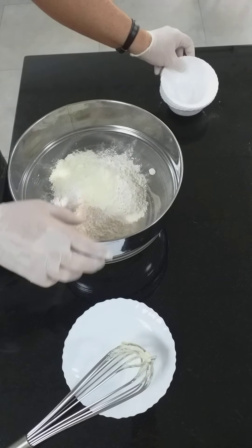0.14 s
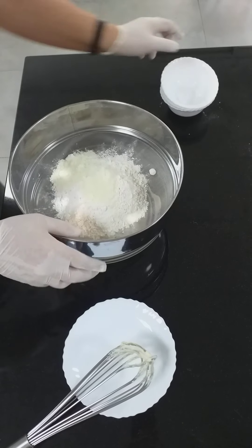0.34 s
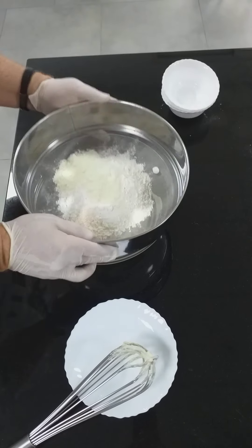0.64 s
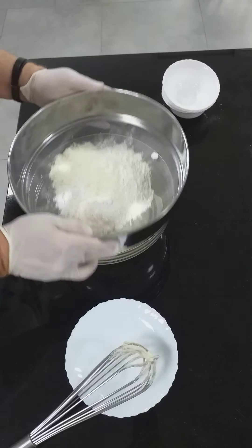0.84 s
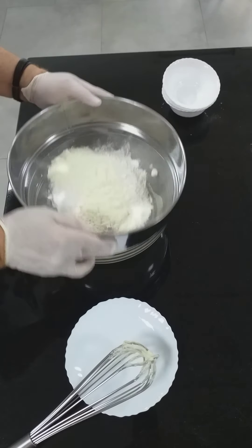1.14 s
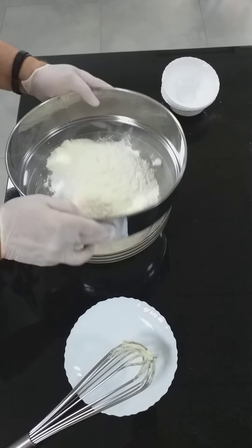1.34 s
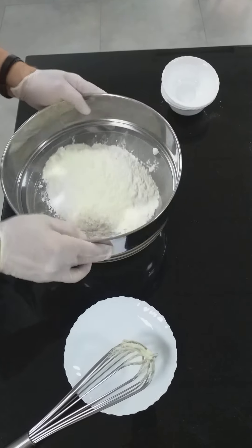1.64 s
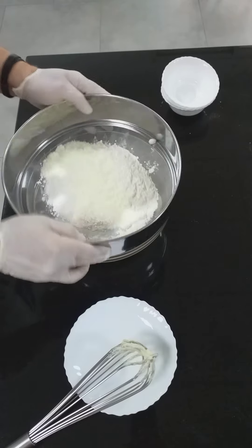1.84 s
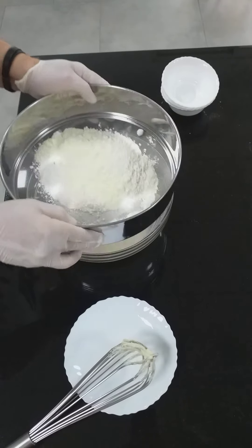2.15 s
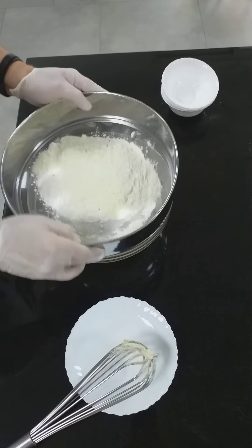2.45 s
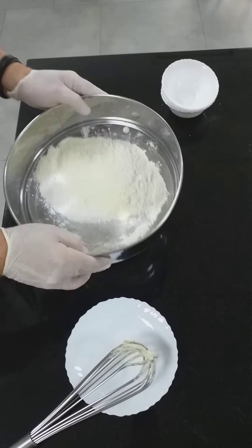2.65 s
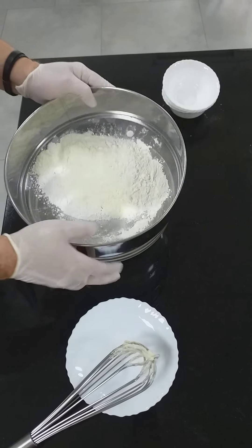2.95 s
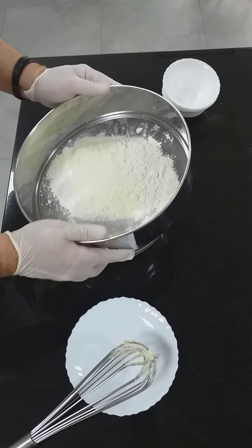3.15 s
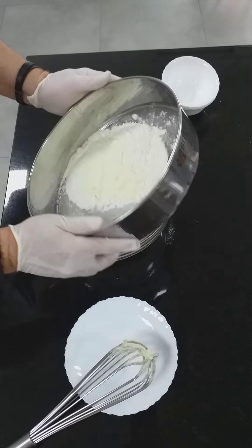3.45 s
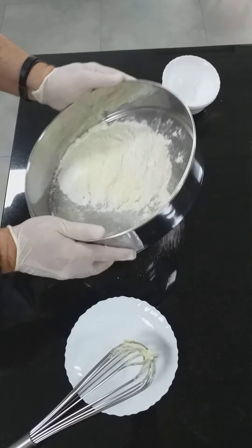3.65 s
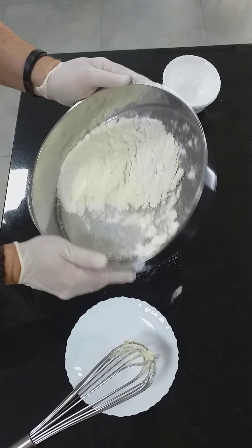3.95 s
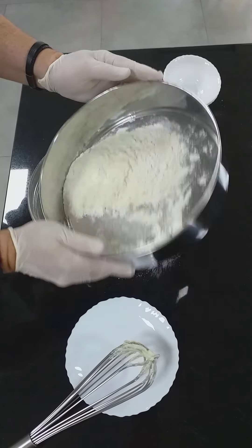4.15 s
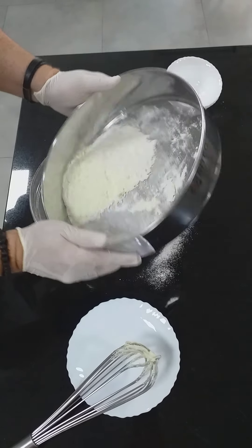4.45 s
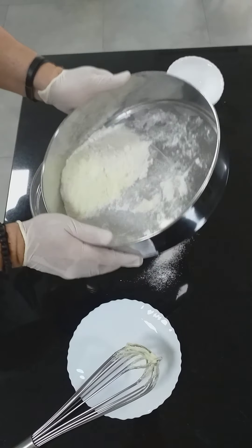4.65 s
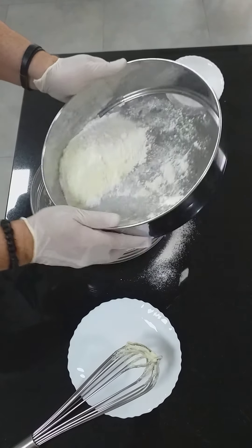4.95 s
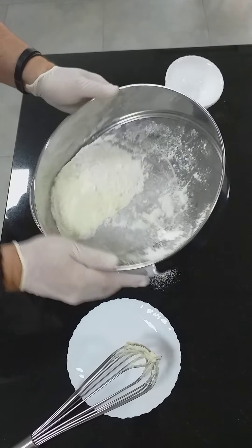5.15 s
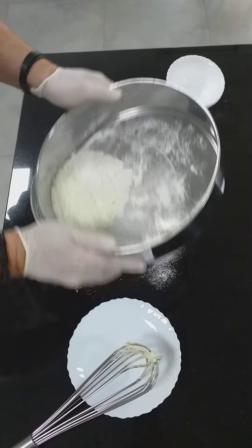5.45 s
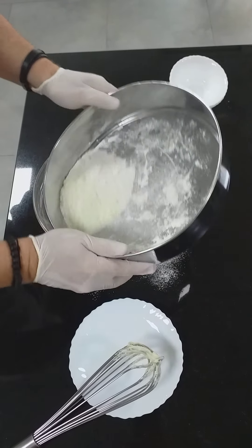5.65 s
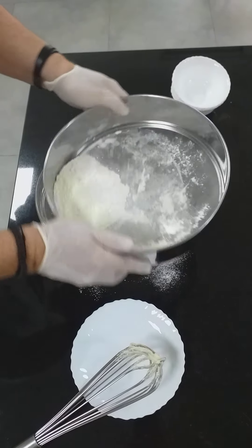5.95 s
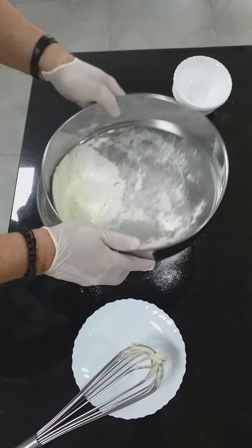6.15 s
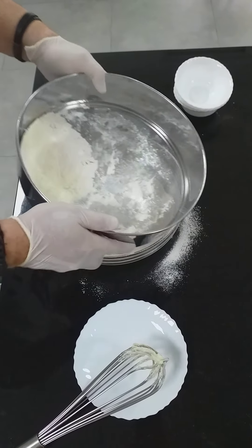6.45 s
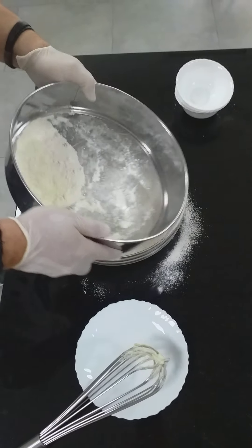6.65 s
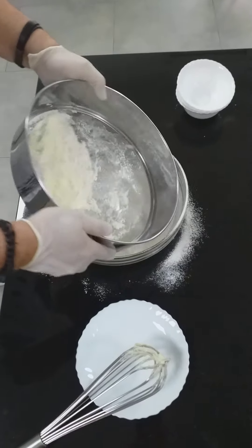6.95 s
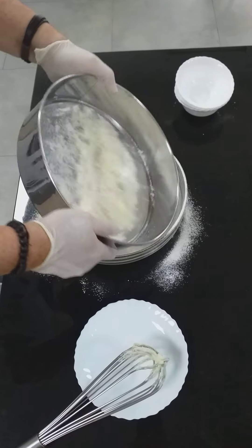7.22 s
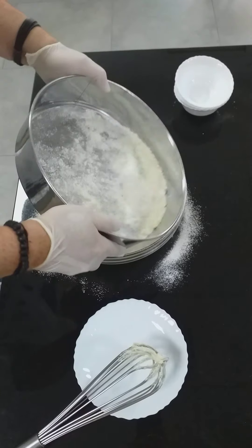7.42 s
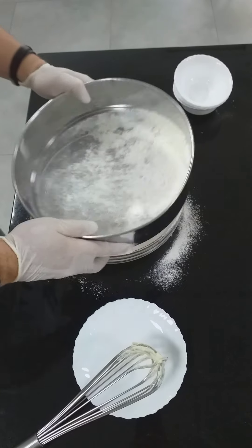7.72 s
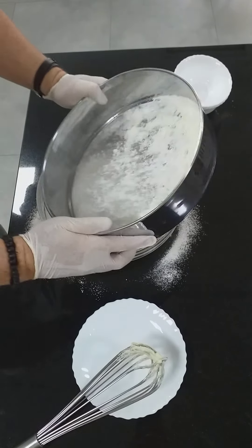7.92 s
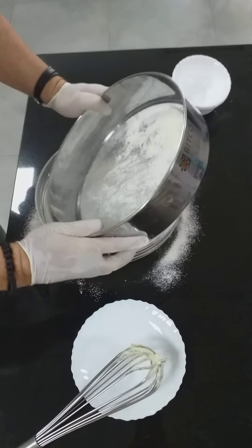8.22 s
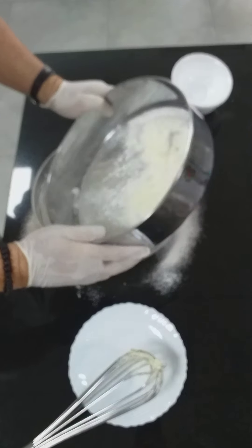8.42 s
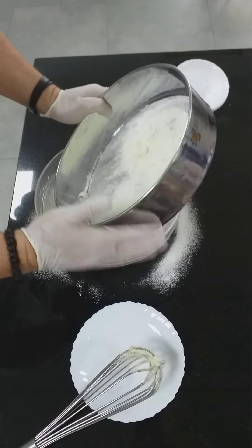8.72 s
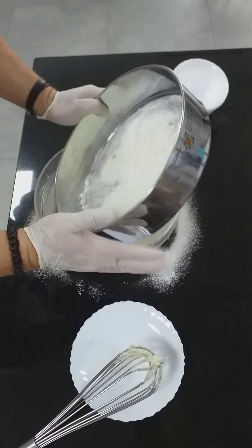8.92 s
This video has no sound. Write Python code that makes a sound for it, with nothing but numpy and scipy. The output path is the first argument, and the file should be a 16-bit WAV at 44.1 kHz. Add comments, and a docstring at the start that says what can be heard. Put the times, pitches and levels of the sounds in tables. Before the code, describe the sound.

In a small hard-walled kitchen with a faint wavering appliance hum, a cup bumps down and a sieve slides with a dry rub. Soft powder hisses in irregular shakes, then in quick even rocking. Light ticks lead to a loud, ringing double clang on the bowl, a few more knocks, and three palm slaps on the hoop. Close microphone, short bright reverberation.

```python
"""A small kitchen with a humming appliance: flour is sifted through a wide steel sieve over a metal bowl.
A cup is set down, the sieve slides off the bowl and is rocked so that powder hisses over its mesh.
It clangs twice on the bowl, and at the end a hand slaps the hoop to shake the rest through.
Hum and hiss are shaped sines and noise, contacts are short noise bursts, ringing metal is decaying sines.
Hard walls answer with tails of decaying noise."""
import sys
import numpy as np
from scipy import signal
from scipy.fft import rfft, irfft
from scipy.io import wavfile

SR = 44100
rng = np.random.default_rng(int(sys.argv[2]) if len(sys.argv) > 2 else 0)


def master(y):
    """Save y as 16-bit WAV."""
    cut = np.clip(np.atleast_2d(y).T, -1, 1)
    pcm = np.round(cut * 32767)  # scale
    wavfile.write(sys.argv[1], SR, pcm.astype(np.int16))


N = 400428
TIME = np.arange(N) / SR  # seconds

# The sieve knocks on the bowl: start_s, clatter_db, tilt_db_per_octave, hoop_ring_db, mesh_ring_db,
# clatter_decay_s
KNOCKS = [(1.170, -35, -11.5, -53, -43.5, 0.019), (7.0383, -14, -1.4, -25, -31, 0.022),
          (7.108, -14, -1.27, -31, -35, 0.0074)]
# The bowl's rim is grazed: start_s, ring_db, click_db
GRAZES = [(7.288, -32, -27.5)]
# The hoop's edge ticks on the bowl: start_s, level_db, body_db, contact_decay_s, edge_ring_db,
# pitch_factor (set by where it touches)
TAPS = [(1.163, -56, 9, 0.002, -74, 1), (1.204, -57, 13, 0.0034, -72, 1), (4.117, -48.5, 4, .005, -62, 1),
        (6.4543, -53, -6, 0.0033, -55, 0.97), (6.478, -52, -2, .004, -58, 1), (6.52, -57, -1, .004, -57, 1),
        (6.554, -42, 0, 0.0033, -44, 1), (6.639, -53, 2, 0.003, -53, 1), (6.7664, -55, 1, 0.0021, -54, 1),
        (7.825, -37.5, -7, 0.0055, -50, 1.29), (7.83, -36, -12, .014, -39, 1.29),
        (7.839, -32, -9, 0.005, -43, 1.29), (8.282, -43, 1.5, 0.01, -60, 1.06),
        (8.369, -29.5, 7, 0.017, -44, 0.53), (8.512, -46.5, 5, .007, -61, .7)]


def gain_of(db):
    """Decibels to amplitude."""
    return 10 ** (np.asarray(db) / 20)


def evened(x):
    """Scales to unit rms."""
    return x / np.sqrt(np.mean(x ** 2) + 1e-20)


def read(points, hz):
    """Reads a spectrum on a log-frequency axis."""
    f, value = np.transpose(points)
    return np.interp(np.log(hz + 1), np.log(f + 1), value)


def level(curve):
    """A level curve, straight in dB between its points, as amplitude."""
    s, db = np.transpose(curve)
    return gain_of(np.interp(TIME, s, db))


def add(mix, s, sound):
    """Mixes a sound in at time s."""
    part = mix[max(round(s * SR), 0):][:len(sound)]
    part += sound[:len(part)]


def colour(x, *spectra, size=4096):
    """Causal minimum-phase filter whose gain is the sum of some dB spectra."""
    hz = abs(np.fft.fftfreq(size, 1 / SR))
    total_db = sum(read(points, hz) for points in spectra)
    log_gain = np.log(gain_of(total_db))
    # the Hilbert transform of the log gain gives the phase
    taps = np.fft.ifft(np.exp(np.conj(signal.hilbert(log_gain)))).real
    return signal.oaconvolve(x, taps[:size // 2])[:len(x)]


def boost(x, peaks):
    """Lifts narrow resonances (pitch_hz, width_hz, level_db) out of a sound."""
    lifted = x
    for hz, width, db in peaks:
        b, a = signal.iirpeak(hz, hz / width, SR)
        lifted = lifted + (gain_of(db) - 1) * signal.lfilter(b, a, x)
    return lifted


def drift(rate_hz):
    """Slow chance of unit rms: noise kept mostly below the rate."""
    hz = np.fft.rfftfreq(N, 1 / SR)
    spectrum = rfft(rng.standard_normal(N)) * np.exp(-(hz / rate_hz) ** 2)
    return evened(irfft(spectrum, N))


def tilt(db_per_octave):
    """A straight slope above 500 Hz, level from 16 kHz: hard contacts are bright, soft ones dull."""
    return [(hz, db_per_octave * np.log2(hz / 500)) for hz in (500, 16000)]


def burst(db, decay, *spectra, treble_life=.4):
    """A crowd of modes struck at once and dying fast, the highest first; db is its energy spread over 10 ms."""
    t = TIME[:SR // 3]
    noise = rng.choice([-1., 1.], len(t))
    high_pass = signal.butter(2, 8500, "high", fs=SR, output="sos")
    top = signal.sosfiltfilt(high_pass, noise)
    body = (noise - top) * (1 - np.exp(-t / 0.0016)) * np.exp(-t / decay)
    # the shorter-lived treble is raised to keep its energy
    tick = top * np.exp(-t / (decay * treble_life)) / np.sqrt(treble_life)
    sound = colour(body + tick, *spectra)
    return gain_of(db) * sound / np.linalg.norm(sound) * np.sqrt(SR / 100)


def ring(modes, blows, rise):
    """Each blow (s, dB, tilt dB per octave) feeds the modes, which swell over the rise time and die away."""
    out, t = np.zeros(N), TIME[:2 * SR]
    for s, db, slope in blows:
        tones = np.zeros(len(t))
        for hz, mode_db, t60 in modes:
            strength = gain_of(mode_db + read(tilt(slope), hz))
            fading = np.exp(-np.log(1000) * t / t60)
            tones += strength * fading * np.sin(2 * np.pi * hz * (s + t))
        add(out, s, gain_of(db) * tones * (1 - np.exp(-t / rise)))
    return out


def swells(strokes, rise, fall):
    """Each stroke (s, dB, length factor) gathers speed and comes to rest in a bell curve; their powers add."""
    power = np.zeros(N)
    for s, db, length in strokes:
        width = length * np.where(TIME < s, rise, fall)
        bell = np.exp(-np.minimum(((TIME - s) / width) ** 2, 20))
        power += (gain_of(db) * bell) ** 2
    return np.sqrt(power)


def appliance(air_db=-54, hum_db=-51.0, waver_hz=2.8):
    """Hum lines whose strength and phase waver, over a soft rush of air with faint whistles."""
    # still air of the kitchen: pitch_hz, relative level_db per Hz
    air = [(30, -43), (70, -12.5), (124, -13), (220, -6.5), (380, -8.5), (560, -15.5), (990, -22.5),
           (1540, -34), (2300, -38.5), (2800, -34.5), (4300, -35.5), (6900, -32.5), (8740, -53),
           (16000, -33.5)]
    # faint whistles in the appliance's draught: pitch_hz, width_hz, boost_db
    draught = [(2765, 51, 14), (3480, 106, 11.5), (3820, 140, 6.5)]
    # steady lines of the appliance: pitch_hz, level_db relative to hum_db, waver_depth
    hum = [(87.8, -17, .6), (175.7, -1, .15), (276.4, -9, .8), (351.1, -5, .4), (447.9, -16, .6),
           (497.6, -17, .8), (526.9, -18, .7), (657, -20, .5)]
    rush = boost(colour(rng.standard_normal(N), air), draught)
    out = gain_of(air_db) * evened(rush)
    for hz, db, waver in hum:
        phasor = 1 + waver * (drift(waver_hz) + 1j * drift(waver_hz))
        phase = 2 * np.pi * hz * TIME + 1.59 * drift(0.88)  # radians
        line = (phasor * np.exp(1j * phase)).real
        out += gain_of(hum_db + db) * evened(line)
    return out


def kitchen(x, first_echo=0.0042):
    """Dense reflections from hard walls, each band with its own strength and decay."""
    # how strongly the walls answer: pitch_hz, relative level_db
    walls = [(400, -3.5), (950, 3), (1900, 0), (5000, -3.5), (12000, -5.5)]
    # reverberation time: pitch_hz, t60_s
    reverberation = [(150, 1), (500, 0.69), (1500, 0.58), (4000, 0.53), (7000, 0.54), (14000, 0.41)]
    noise = rng.standard_normal(SR) * (rng.random(SR) < 4000 / SR)  # about 4000 reflections per second
    hz, t, z = signal.stft(noise, SR, nperseg=256)
    strength = gain_of(read(walls, hz))[:, None]
    fading = np.exp(-np.log(1000) * t / read(reverberation, hz)[:, None])
    tail = signal.istft(z * strength * fading, SR, nperseg=256)[1][:SR]
    # silent until the first echo, in full after twice that time
    tail = tail * np.clip(TIME[:SR] / first_echo - 1, 0, 1)
    return signal.fftconvolve(x, tail / np.linalg.norm(tail))[:N]


def echoes(x, turn_s=0.16, count=3):
    """Several random tails of the same kitchen cross-fade in turn, so that like hits do not share one echo colour."""
    turn = TIME / turn_s
    out = np.zeros(N)
    for k in range(count):
        distance = abs((turn - k + count / 2) % count - count / 2)  # in turns, around the cycle
        share = np.cos(np.pi / 2 * np.minimum(distance, 1))
        out += kitchen(x * share)
    return out


def touch(db, decay, body_db, sparkle_db, thud_db):
    """A blow on the hand-damped sieve: body below 3.8 kHz, sparkle above 8 kHz, and a low thud."""
    # colour of a tap on the hoop damped by the hand: pitch_hz, relative level_db per Hz
    tap_colour = [(80, -23), (400, -20.5), (1000, -20), (1400, -10), (2400, -8), (3200, 2.5), (3900, -3.5),
                  (4600, 0), (5200, -4.5), (6200, 3.5), (7200, -3), (8400, -22), (9600, -24), (14000, -10)]
    # push of the palm: pitch_hz, relative level_db per Hz
    palm_colour = [(40, -26), (80, 0), (140, 3), (250, -3), (420, 0.5), (700, -10), (1500, -20.5)]
    shade = [(3800, body_db), (5800, 0), (8000, 0), (13000, sparkle_db)]
    contact = burst(db, decay, tap_colour, shade)
    return contact + burst(db + thud_db - 19.5, 0.0066, palm_colour)


def contacts(sparkle_per_body=-0.38):
    """The short clatter of every knock, graze, bump, tick, flick and slap, as noise bursts."""
    # crowd of short-lived steel modes in a knock: pitch_hz, relative level_db per Hz
    clang = [(60, -36), (150, -5), (290, -17.5), (480, 3.5), (720, -8.5), (1050, -5), (1500, -9),
             (1850, -6), (2300, -9.5), (3600, -10.5), (4200, -14.5), (7000, -12.5), (9300, -33),
             (14000, -22)]
    # groups of steel modes that stand out of the clatter: pitch_hz, width_hz, boost_db
    steel = [(1000, 90, 2), (1830, 60, 8.5), (2670, 80, 7), (2920, 92, 4.5), (3380, 110, 10),
             (3660, 69, 12.5), (4540, 80, 7.5), (5600, 63, 11.5), (6960, 160, 4)]
    # colour of the rim's click: pitch_hz, relative level_db per Hz
    scratch = [(60, -42), (500, 3), (1100, -20), (1700, 11), (2500, -15), (3300, 5.5), (4200, -12.5),
               (7000, -14.5), (9300, -44), (14000, -27)]
    # dull bumps of things on the counter: start_s, level_db before the trim below,
    # tilt_db_per_octave, decay_s
    bumps = [(0.0, -37.5, 3, 0.027), (0.065, -33, -0.5, 0.029), (0.096, -36.5, 0, 0.021),
             (7.718, -35, 4, 0.023), (7.929, -61, 5, 0.007)]
    # colour of a bump: pitch_hz, relative level_db per Hz
    bump_colour = [(50, -61), (150, -5), (450, -4.5), (610, -5), (800, -7.5), (1050, -2), (1300, -13),
                   (1800, -11), (3500, -19.5), (6000, -36), (9000, -56)]
    # hollow resonances of the counter: pitch_hz, width_hz, boost_db
    hollow = [(760, 230, 6), (940, 120, 0.5), (1500, 150, 4.5)]
    # a finger flicks the mesh: start_s, level_db
    flicks = [(2.668, -41.5), (6.384, -51), (6.552, -34.5), (8.195, -36.5)]
    # the palm slaps the hoop: start_s, level_db, contact_decay_s
    slaps = [(8.696, -23, 0.014), (8.8601, -21.5, 0.0088), (9.011, -26, 0.012)]
    out = np.zeros(N)
    for s, db, slope, _, _, decay in KNOCKS:
        add(out, s, boost(burst(db, decay, clang, tilt(slope)), steel))
    for s, _, db in GRAZES:
        add(out, s, burst(db, 0.0088, scratch))
    for s, db, slope, decay in bumps:
        add(out, s, boost(burst(db - 2.5, decay, bump_colour, tilt(slope)), hollow))
    for s, db, body_db, decay, _, _ in TAPS:
        sparkle_db = -4 + sparkle_per_body * body_db  # the leaner the tick, the more it sparkles
        add(out, s, touch(db, decay, body_db, sparkle_db, thud_db=-17))
    for s, db in flicks:
        add(out, s, touch(db, decay=0.0057, body_db=-2.5, sparkle_db=15, thud_db=-18))
    for s, db, decay in slaps:
        add(out, s, touch(db, decay, body_db=0.5, sparkle_db=1, thud_db=6))
    return out


def ringing(softness=3.2):
    """Hoop, mesh and bowl sing on after they meet; in the hoop a soft knock wakes mostly the low modes."""
    # ringing of the steel hoop: pitch_hz, relative level_db, t60_s
    hoop_modes = [(339, -7, .6), (394.5, -5, .7), (427.9, 0, .7), (523.1, -7, .65), (568.3, -2, .65),
                  (614, -11, .4), (787, -10, .65), (839, -9, .65), (922.8, -7, .65), (1002.6, -1, .6),
                  (1144, -6, .5), (1265, -8, .45), (1737, -7, .55), (1769, -8, .5), (1795.8, -1, .58),
                  (1812.3, -1, .58), (1840, -2.5, .55), (2094, -8, .5), (2643, -8, .55), (2940, -8, .45),
                  (3656.1, 4, .66), (3690, -5, .55), (4480, -10, .45), (5620, -10, .35)]
    # the taut mesh as a drum skin: pitch_hz, relative level_db, t60_s
    mesh_modes = [(134.5, 0, 1.75), (178, -8, .9), (465.7, 4, .8)]
    # ringing of the bowl's rim: pitch_hz, relative level_db, t60_s
    rim_modes = [(1110, -10, 0.27), (1510, 0, 0.32), (1550, -5.5, 0.46), (1666, -5, 0.23), (1740, 4, 0.29),
                 (2250, -10, 0.16), (2560, -14, 0.35), (2540, -10, 0.43), (3350, 2.5, 0.13),
                 (3320, -12, 0.27), (3370, -14, .28), (3520, -8, .25)]
    # thin, brief ring of the hoop's edge: pitch_hz (before a tap's factor), relative level_db, t60_s
    edge_modes = [(4430, -6, .1), (4550, -2, .14), (4640, 0, .16), (4790, -5, .1), (5430, -4, .12),
                  (5560, -7, .1)]
    hoop_blows = [(s, db, softness * min(slope, 0)) for s, _, slope, db, _, _ in KNOCKS]
    mesh_blows = [(s, db, 0) for s, _, _, _, db, _ in KNOCKS]
    rim_blows = [(s, db, 0) for s, db, _ in GRAZES]
    out = ring(hoop_modes, hoop_blows, rise=0.0029)
    out += ring(mesh_modes, mesh_blows, rise=0.028)
    out += ring(rim_modes, rim_blows, rise=0.00084)
    for s, _, _, _, db, pitch in TAPS:
        out += ring(np.multiply(edge_modes, (pitch, 1, 1)), [(s, db, 0)], rise=0.00051)
    return out


def slide(trim_db=-1, catch_db=0.4):
    """Cup and sieve slide: a smooth dry rub whose surfaces catch slightly."""
    # the slides: peak_s, level_db before the trim, length_factor
    slides = [(0.0, -62, 0.56), (0.222, -44, 0.69), (0.68, -30.5, 0.9)]
    # colour of their rub: pitch_hz, relative level_db per Hz
    rub_colour = [(60, -53), (300, -2), (700, -10), (1200, -3.5), (1800, 2.5), (3000, 4), (4000, 2.5),
                  (5500, -6.5), (7000, -9.5), (8200, -30), (9300, -40), (11500, -25), (15500, -15)]
    friction = rng.standard_normal(N) * gain_of(catch_db * drift(120))
    strokes = swells(slides, rise=0.1, fall=0.11)  # seconds
    return gain_of(trim_db) * strokes * evened(colour(friction, rub_colour))


def rocking(count=6, start_s=5.352, period_s=0.1248, first_db=-53.5, growth_db=0.63, length=1.52):
    """A spell of even rocking to and fro: evenly spaced throws that grow a little stronger."""
    return [(start_s + k * period_s, first_db + k * growth_db, length, 0) for k in range(count)]


def grain_hiss(grains_per_s=12000, spread_db=2, clump_db=0.36):
    """Countless grains tick over the wires at random, in small clumps, coloured by the sieve."""
    # colour of the powder: pitch_hz, relative level_db per Hz
    powder_colour = [(600, -5), (1350, -8), (1800, -4.5), (2500, -2), (3200, 4.5), (3800, -1), (5400, 1),
                     (7000, 4.5), (8200, -14.5), (9500, -19.5), (11000, -7.5), (13500, -2.5), (15500, -3.5)]
    # resonances of the sieve that colour the hiss: pitch_hz, width_hz, boost_db
    pan = [(1790, 78, 8.5), (2110, 200, 2.5), (2800, 100, 5), (3400, 250, 2), (4520, 230, 6)]
    sizes = gain_of(spread_db * np.minimum(rng.exponential(1, N), 5))
    grains = sizes * rng.standard_normal(N) * (rng.random(N) < grains_per_s / SR)
    clumped = grains * gain_of(clump_db * drift(50))
    return evened(boost(colour(clumped, powder_colour), pan))


def powder(trim_db=-3, uneven_db=2.5, uneven_hz=12, body_hz=2600, creep_body_db=-2):
    """Flour hisses over the mesh: an uneven creep, and a swell with every throw of the heap."""
    # the heap creeping between jolts as the sieve is tipped: time_s, level_db before the trim
    creep_curve = [(0.05, -59), (0.52, -58.5), (1.0, -63), (1.55, -62), (1.8, -57.5), (2.2, -64),
                   (2.85, -59.5), (3.55, -66.5), (4.0, -55.5), (4.28, -57.5), (4.85, -89), (5.65, -55.5),
                   (6.27, -65.5), (6.6, -57), (7.5, -60), (8.1, -65), (8.35, -52.5), (9.08, -75)]
    # single jolts, each throwing the heap across the mesh: peak_s, level_db before the trim,
    # length_factor, body_db (by which it wakes the pan's low body)
    jolts = [(1.465, -58.5, .8, -6), (1.835, -56, 1.2, 8.5), (1.92, -57, 0.88, 7), (2.03, -50, 1.54, 1),
             (2.33, -51.5, 1.2, 1), (2.445, -58, 1.1, 7), (2.635, -52, 0.98, 2), (2.72, -49, 1.6, 2.5),
             (3.21, -53, 1.1, -19), (3.36, -55, .9, -15), (3.425, -50, 0.73, 6), (3.49, -56.5, 1.3, 9),
             (3.615, -57, 1, 4), (3.735, -53.5, 0.52, -4), (3.885, -55, 1.3, -8), (4.05, -51, 1.7, -5),
             (4.18, -46.5, 0.85, -1.5), (4.44, -50, 1.3, -0.5), (4.54, -58, 2.9, 4), (5.07, -59, .8, -12),
             (5.228, -48, 1.26, -6), (6.16, -57, 1.1, -9), (6.335, -57, .8, -13), (7.02, -49.5, 0.66, 3),
             (7.3, -46.5, 1.4, 0)]
    hiss = grain_hiss()
    low_pass = signal.butter(3, body_hz, fs=SR, output="sos")
    body = signal.sosfiltfilt(low_pass, hiss)
    wires = hiss - body
    creep = level(creep_curve) * gain_of(uneven_db * drift(uneven_hz))
    throws = jolts + rocking()
    rise_s, fall_s = 0.027, 0.047
    on_wires = swells([(s, db, length) for s, db, length, _ in throws], rise_s, fall_s)
    on_pan = swells([(s, db + body_db, length) for s, db, length, body_db in throws], rise_s, fall_s)
    wire_level = np.hypot(creep, on_wires)
    body_level = np.hypot(gain_of(creep_body_db) * creep, on_pan)
    return gain_of(trim_db) * (wire_level * wires + body_level * body)


def scene(hit_room_db=-5, rub_room_db=-10):
    """Everything on the counter, with the room around its hits and rubs."""
    hits = contacts()
    rubs = powder() + slide()
    room = echoes(gain_of(hit_room_db) * hits + gain_of(rub_room_db) * rubs)
    return (hits + rubs + ringing() + room + appliance())[None]


def record(dry, low_cut_hz=55, top_hz=15900):
    """The microphone sheds deep bass; then the recorder's band limit."""
    high_pass = signal.butter(2, low_cut_hz, "high", fs=SR, output="sos")
    thin = signal.sosfilt(high_pass, dry)
    band_limit = signal.firwin(511, top_hz, window=("kaiser", 9), fs=SR)
    return signal.oaconvolve(thin, band_limit[None], "same")


dry = scene()
out = record(dry)
master(out)
```